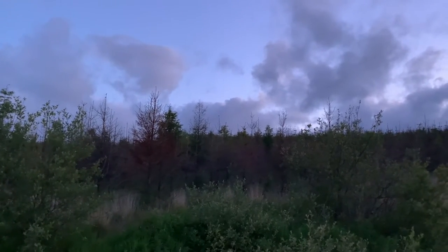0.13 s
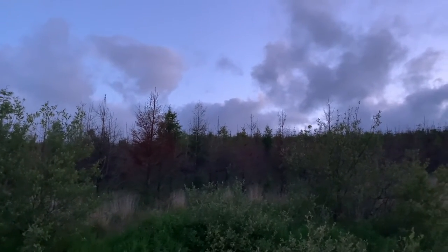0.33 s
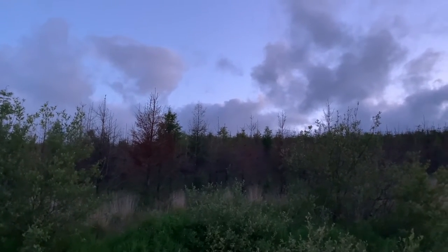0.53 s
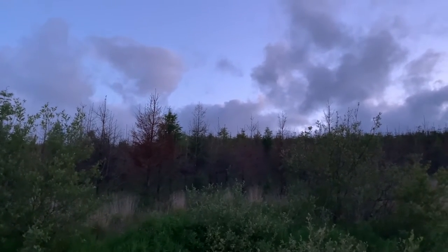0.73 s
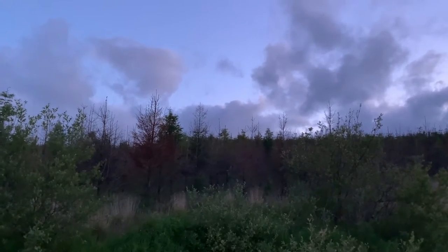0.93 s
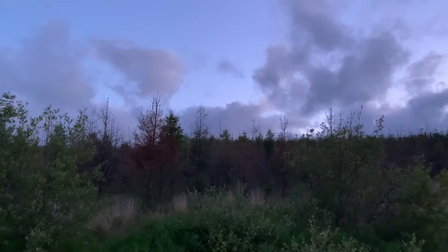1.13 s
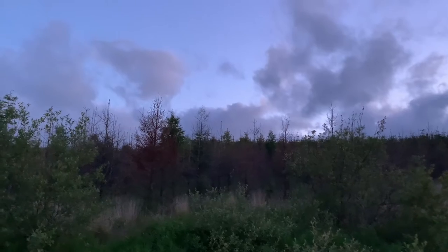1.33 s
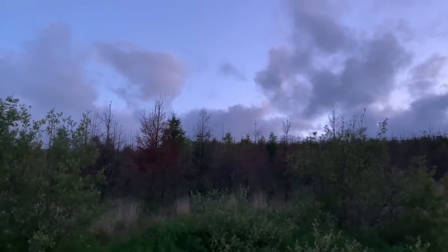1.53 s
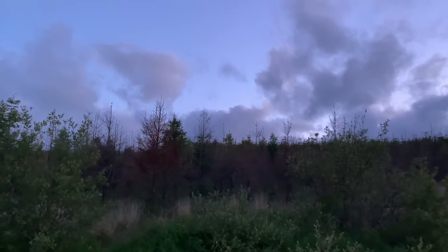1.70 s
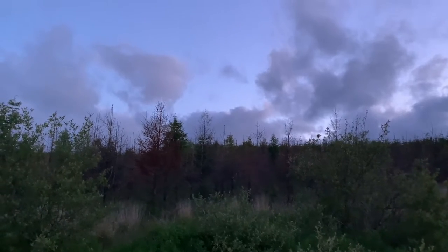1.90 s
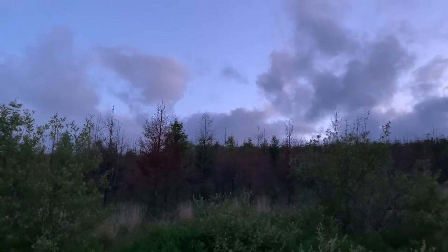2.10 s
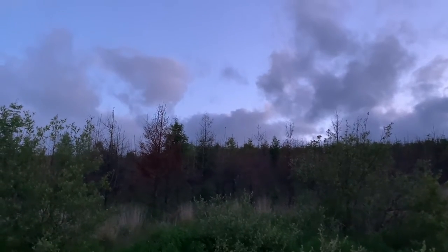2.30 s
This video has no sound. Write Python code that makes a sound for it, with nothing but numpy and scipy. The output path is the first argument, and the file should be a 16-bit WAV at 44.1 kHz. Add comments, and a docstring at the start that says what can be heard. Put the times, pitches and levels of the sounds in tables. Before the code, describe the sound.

A nightjar churs throughout, right of centre: rapid short falling whistles, about 28 per second, blurred by woodland echo. Around 0.35-0.4 s the trill speeds to about 43 per second, lower and softer, then slows back by 0.8 s and continues steadily, strongest near 1.6 s. Deep wind rumble buffets the stereo microphone, with thumps near 0.25, 1.13, 1.25 and 2.07 s, over faint hiss.

```python
"""At the edge of a forest at dusk a nightjar churs, to the right of a stereo microphone.
Its notes are quick falling whistles, swept sines that drop once to a faster, lower run.
A reflection close behind each note hollows its tone; the trees, modelled as decaying noise, smear a wash.
Wind buffets the microphone, as shaped noise and single thumps, over a faint background of distant air
and hiss that swells briefly in a narrow band."""
import sys
import numpy as np
from scipy import signal
from scipy.fft import rfft, irfft, next_fast_len
from scipy.io import wavfile
from scipy.ndimage import uniform_filter1d

SR = 44100
rng = np.random.default_rng(int(sys.argv[2]) if len(sys.argv) > 2 else 0)


def int16_out(signal):
    """Quantize to a 16-bit WAV file."""
    q = np.round(np.clip(np.atleast_2d(signal).T, -1, 1) * 32767)
    wavfile.write(sys.argv[1], SR, q.astype(np.int16))


N = 103635  # samples in the scene

PREROLL_S = .5  # song before the scene opens, so the trees are already ringing


def undb(db):
    """Decibels to gain."""
    return 10 ** (np.asarray(db) / 20)


def curve(table, t, axis=1):
    """One column of a table, joined by straight lines over its first column."""
    table = np.array(table)
    return np.interp(t, table[:, 0], table[:, axis])


def noise(gain):
    """Noise of rms 1 whose spectrum follows gain(Hz)."""
    size = next_fast_len(N)
    hz = np.maximum(np.fft.rfftfreq(size, 1 / SR), 1)
    spectrum = rfft(rng.standard_normal(size)) * gain(hz)
    x = irfft(spectrum, size)[:N]
    return x / x.std()


def bump(when_s, half_s):
    """A smooth bell-shaped rise and fall around one moment."""
    t = np.arange(N) / SR
    return np.exp(-.5 * ((t - when_s) / half_s) ** 2)


def late(x, seconds):
    """Delay a sound by its extra travel time."""
    return np.concatenate([np.zeros(int(seconds * SR)), x])[:len(x)]


def air():
    """Faint steady air and hiss: alike in both channels in the bass, spread wide above it."""
    level_db, alike_below_hz = -66.5, 607
    # spectrum of distant air and hiss, relative levels: pitch_hz, density_db (dB per Hz)
    air_spectrum = [(40, -8), (150, 3.5), (350, -1.5), (600, 1), (900, -2.5), (1300, -1.5), (2000, -20.5),
                    (2800, -20.5), (4300, -21), (6500, -24.5), (8500, -32.5), (11000, -22), (13000, -32.5),
                    (15500, -39)]
    points = np.array(air_spectrum)

    def colour(hz):
        return undb(np.interp(np.log(hz), np.log(points[:, 0]), points[:, 1]))

    mid = noise(colour)
    above_bass = signal.butter(4, alike_below_hz, "high", fs=SR, output="sos")
    side = signal.sosfilt(above_bass, noise(colour))
    return undb(level_db) * np.array([mid + side, mid - side]) / np.sqrt(2)


def swell():
    """The far background swells briefly in a narrow band, as separate noise in each channel."""
    peak_s, half_s, level_db = .1, .065, -67
    centre_hz, width_hz = 716, 130

    def band(hz):
        return np.exp(-.5 * ((hz - centre_hz) / width_hz) ** 2)

    return undb(level_db) * bump(peak_s, half_s) * np.array([noise(band), noise(band)])


def turbulence(low_hz, roll_hz, even_s=0.052):
    """Churning air of even strength above a low edge, dying away towards the treble."""
    x = noise(lambda hz: np.exp(-hz / roll_hz) / np.hypot(1, np.square(low_hz / hz) ** 2))
    # the running power is divided out, leaving an rms near 1 throughout
    power = uniform_filter1d(np.abs(signal.hilbert(x)) ** 2, int(even_s * SR)) / 2
    return x / np.sqrt(power)


def wind():
    """Wind on the microphone: turbulent rumble, gusts and single eddies, alike in both channels."""
    rumble_low_hz, rumble_roll_hz = 54.4, 33.3
    eddy_cycles = 0.7  # cycles from the middle of a thump to 1/e of its envelope
    # low rumble of the wind, rising and sinking unevenly: time_s, level_db
    rumble_levels = [(0, -58.5), (.07, -45.5), (.12, -59), (.2, -40), (.33, -45.5), (.42, -48.5), (.5, -48),
                     (.58, -49.5), (.8, -45), (.95, -37), (1.03, -43.5), (1.2, -45.5), (1.38, -39.5),
                     (1.48, -50), (1.54, -51.5), (1.6, -50), (1.7, -69), (1.755, -50.5), (1.8, -72.5),
                     (1.87, -64.5), (1.96, -45), (2.02, -49.5), (2.09, -46.5), (2.14, -69), (2.22, -50),
                     (2.28, -55), (2.35, -44.5)]
    # gusts on the microphone: middle_s, half_length_s, level_db, low_edge_hz, roll_off_hz
    gusts = [(0.263, 0.011, -29, 60, 97.7), (.325, 0.01, -40.5, 85, 74), (0.383, 0.0073, -49, 70, 91),
             (0.464, .014, -45, 62, 67), (.648, 0.02, -35.5, 117.4, 81.4), (0.727, 0.0063, -38.5, 98, 55),
             (0.8, 0.014, -33, 63.4, 81), (.847, 0.011, -35.5, 90, 152), (0.889, 0.025, -33, 90, 108),
             (1.05, 0.074, -51, 90, 75), (1.154, .024, -33, 69, 106.5), (1.244, 0.011, -42, 104.6, 63),
             (1.327, .024, -38.5, 85.3, 92), (1.331, 0.0082, -42.5, 110, 169),
             (.883, 0.0064, -34.5, 109, 168), (1.435, 0.028, -45, 74, 74), (1.64, 0.0074, -45, 112, 44.2),
             (2.058, 0.021, -35.5, 48.6, 75.7)]
    # single eddies that thump the microphone: middle_s, level_db, pitch_hz
    eddies = [(0.233, -24.5, 83.4), (0.264, -38, 90.6), (1.131, -29, 86.5), (1.251, -23, 74.7),
              (2.072, -28.5, 54)]

    t = np.arange(N) / SR
    out = undb(curve(rumble_levels, t)) * turbulence(rumble_low_hz, rumble_roll_hz)
    for when_s, half_s, db, low_hz, roll_hz in gusts:
        out += undb(db) * bump(when_s, half_s) * turbulence(low_hz, roll_hz)
    for when_s, db, hz in eddies:
        cycles = (t - when_s) * hz
        envelope = np.exp(-(cycles / eddy_cycles) ** 2)
        out += undb(db) * envelope * np.sin(2 * np.pi * cycles)
    return out


def forest(x):
    """Countless faint echoes from trunks and branches, a little dulled by the foliage."""
    t60_s, build_s, top_hz = .6, .01, 2000
    t = np.arange(SR) / SR
    build = 1 - np.exp(-t / build_s)
    decay = np.exp(-np.log(1000) * t / t60_s)  # 60 dB down after t60_s
    echoes = rng.standard_normal(SR) * build * decay
    wet = signal.fftconvolve(x, echoes / np.linalg.norm(echoes))[:len(x)]
    return signal.sosfilt(signal.butter(2, top_hz, fs=SR, output="sos"), wet)


def churr():
    """A train of falling whistles; the faster the pace, the lower they start and the softer the attack."""
    first_note_s, note_s = -.4631, .012
    slow_rate, fast_rate = 28, 42  # notes per s between which the note shape changes
    slow_start_hz, slow_end_hz = 2280, 1300
    fast_start_hz, fast_end_hz = 2090, 1420
    slow_attack, fast_attack, hold_until = .25, .42, .48  # shares of the note
    sweep_bend, release_power = 1.2, .9
    pitch_scatter, level_scatter_db = .01, .8  # note to note; pitch as a share
    # pace of the churr: time_s, rate_hz (notes per s)
    pace = [(.3, 28.5211), (.35, 33.4947), (.4, 43.4923), (.66, 41.0611), (.78, 34.5379), (.82, 27.2573),
            (1.3, 28.0597), (2.35, 28.2086)]

    out = np.zeros(N + SR)
    u = np.arange(int(note_s * SR)) / (note_s * SR)  # progress through one note, 0-1
    fall = np.sin(np.pi / 2 * u ** sweep_bend) ** 2
    release = np.minimum((1 - u) / (1 - hold_until), 1) ** release_power
    start_s = first_note_s
    while start_s < N / SR:
        rate = curve(pace, start_s)

        def by_pace(slow, fast):
            return np.interp(rate, [slow_rate, fast_rate], [slow, fast])

        top_hz = by_pace(slow_start_hz, fast_start_hz)
        end_hz = by_pace(slow_end_hz, fast_end_hz)
        attack = np.sin(np.pi / 2 * np.minimum(u / by_pace(slow_attack, fast_attack), 1)) ** 2
        pitch, strength, phase = rng.standard_normal(3)
        hz = (top_hz + (end_hz - top_hz) * fall) * (1 + pitch_scatter * pitch)
        whistle = np.sin(2 * np.pi * (phase + np.cumsum(hz) / SR))
        i = int((start_s + PREROLL_S) * SR)
        out[i:i + len(u)] += undb(level_scatter_db * strength) * attack * release * whistle
        start_s += 1 / rate
    return out


def nightjar():
    """The bird, off to the right: direct notes, their close reflection and the wash of the trees."""
    reflection_s = .00212  # extra travel time of the close reflection
    left_lag_s, left_db, left_reflection = .0004, -6, .35  # the left hears it later and weaker
    forest_left_db = -3.5
    # sound straight from the bird: time_s, level_db, reflection_share (0-1, right channel)
    direct_levels = [(0, -45.5, 0.43), (.25, -47, 0.98), (.36, -45.5, 0.72), (.46, -45.5, 0.53),
                     (.52, -53.5, 0.5), (.78, -53.5, 1), (.9, -51, 0.92), (1.2, -53, 1), (1.35, -50, 0),
                     (1.6, -44, 0), (1.83, -46.5, 0), (1.93, -51, .05), (2.1, -50, 0.2), (2.25, -53.5, 0.3)]
    # notes sent into the trees: time_s, level_db
    wash_levels = [(0, -49.5), (.4, -49), (.7, -52), (1.1, -50), (1.6, -48), (1.9, -49), (2.35, -51.5)]

    song = churr()
    t = np.arange(len(song)) / SR - PREROLL_S
    direct = song * undb(curve(direct_levels, t))
    sent = song * undb(curve(wash_levels, t))
    reflection = late(direct, reflection_s)
    right = direct + curve(direct_levels, t, axis=2) * reflection + forest(sent)
    left = undb(left_db) * late(direct + left_reflection * reflection, left_lag_s)
    left += undb(forest_left_db) * forest(sent)  # its own echoes, so the wash spreads
    return np.array([left, right])[:, int(PREROLL_S * SR):][:, :N]


def scene():
    """Background, wind and bird together, as left and right channels."""
    return air() + swell() + wind() + nightjar()


def record(dry):
    """The recorder cuts the top with a steep low-pass at 15500 Hz."""
    return signal.sosfilt(signal.ellip(8, .2, 70, 15500, fs=SR, output="sos"), dry)


dry = scene()
out = record(dry)
int16_out(out)
```